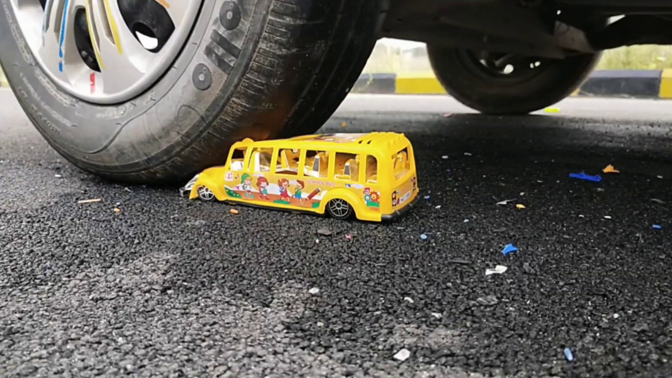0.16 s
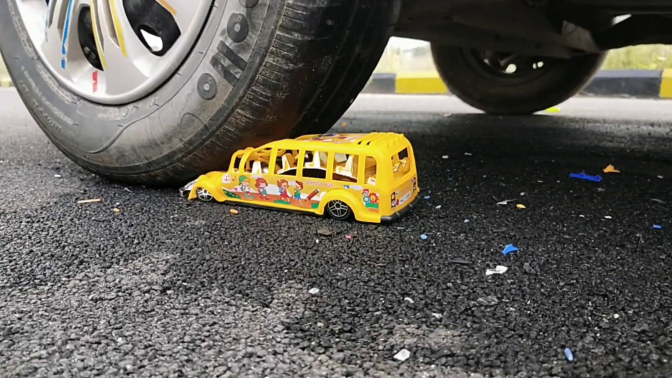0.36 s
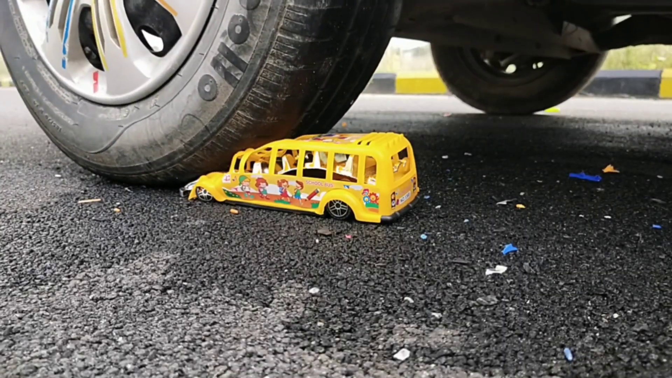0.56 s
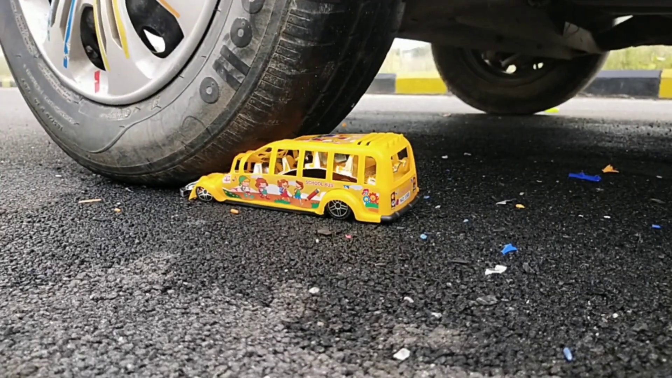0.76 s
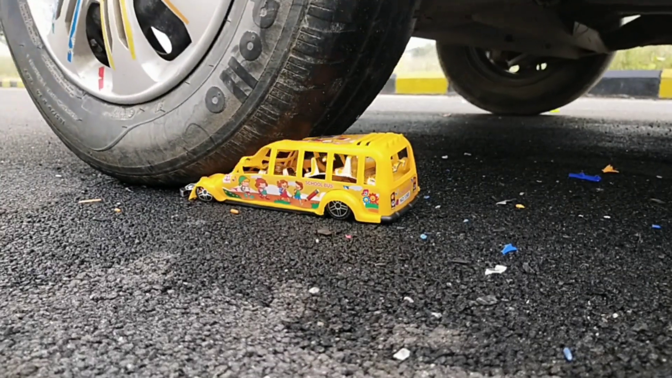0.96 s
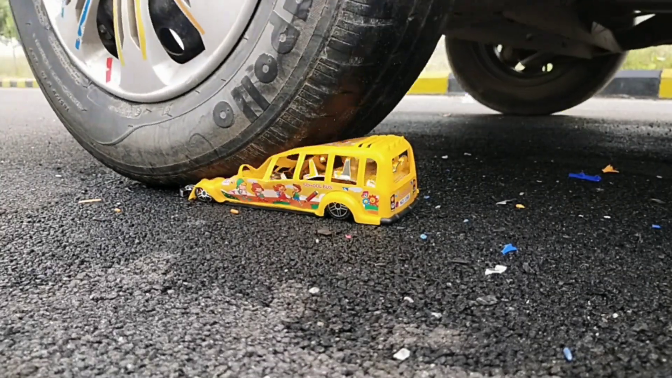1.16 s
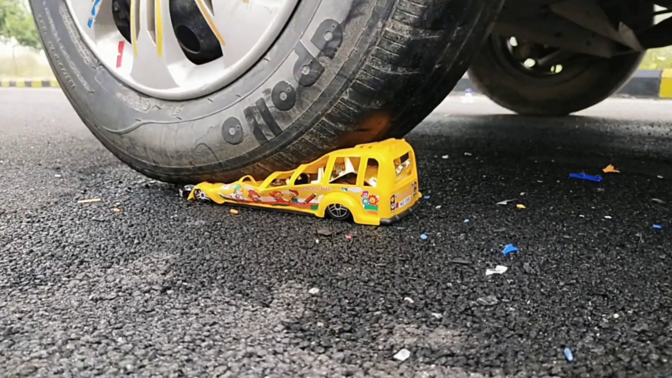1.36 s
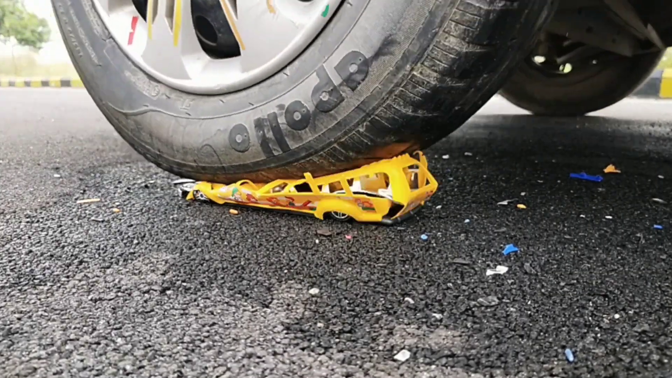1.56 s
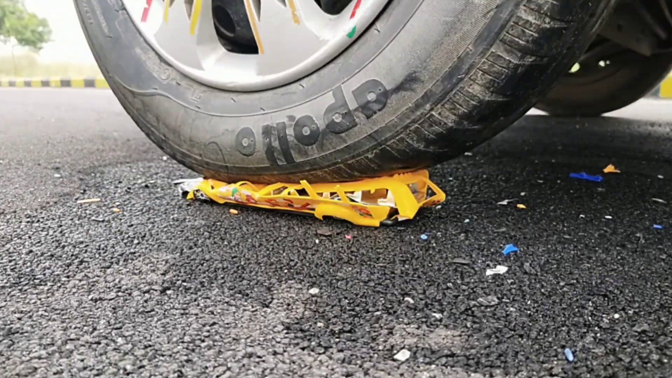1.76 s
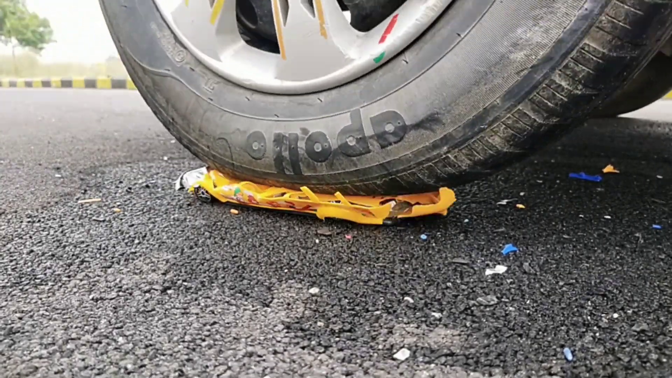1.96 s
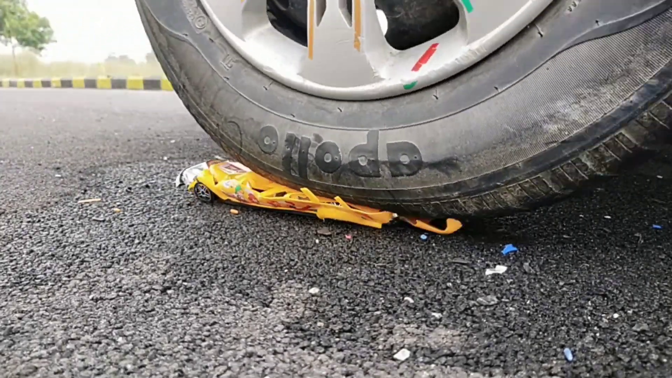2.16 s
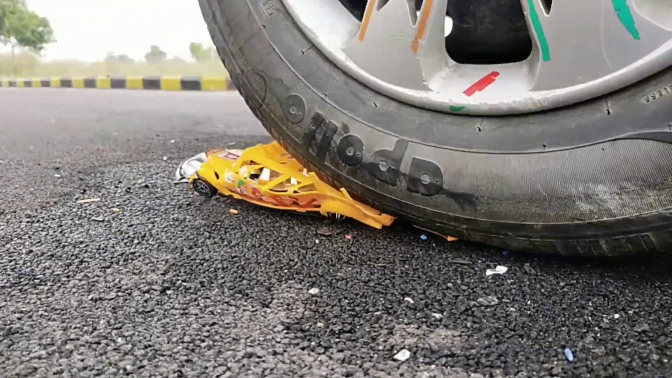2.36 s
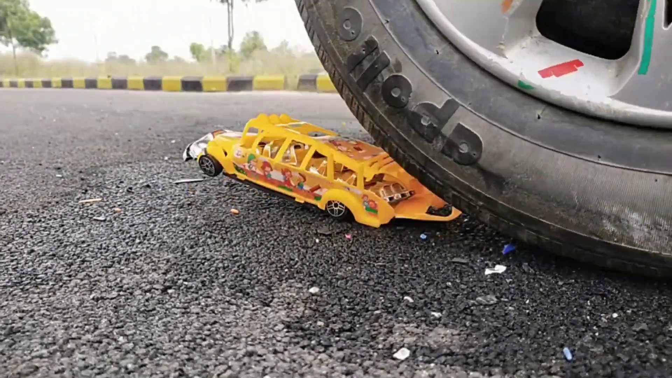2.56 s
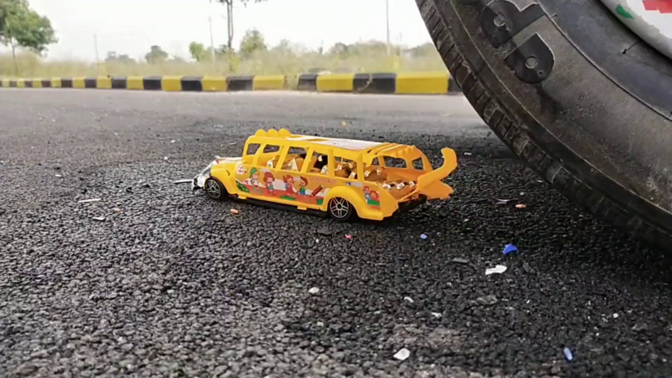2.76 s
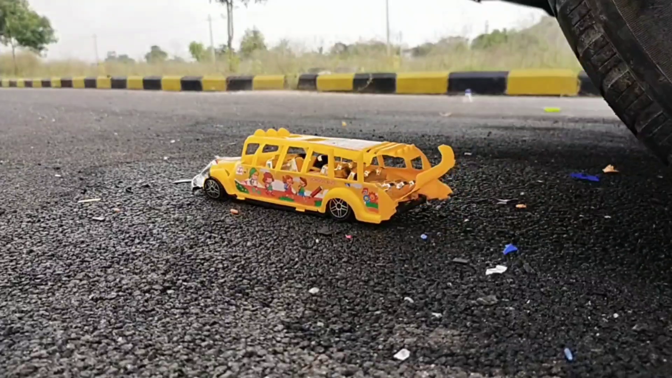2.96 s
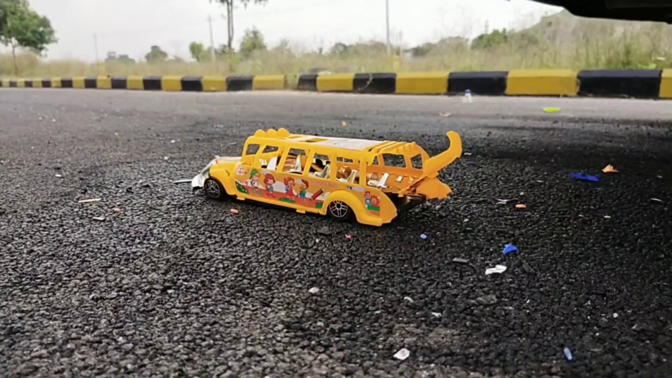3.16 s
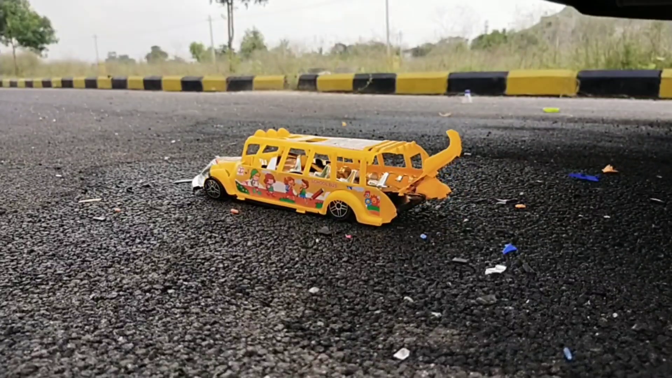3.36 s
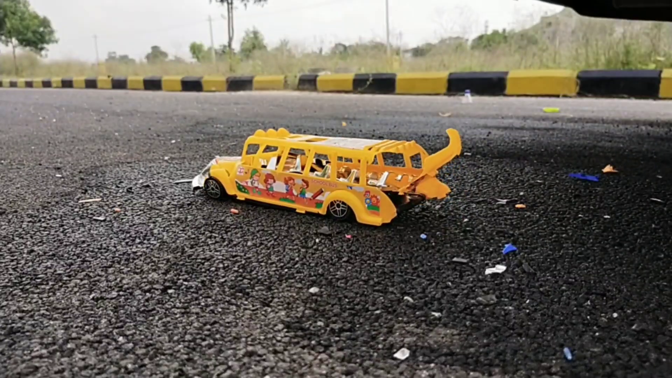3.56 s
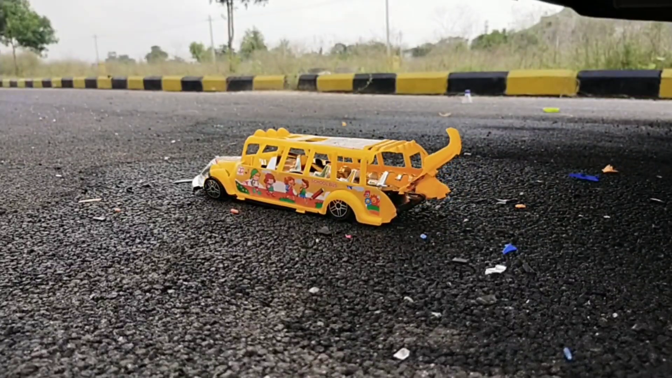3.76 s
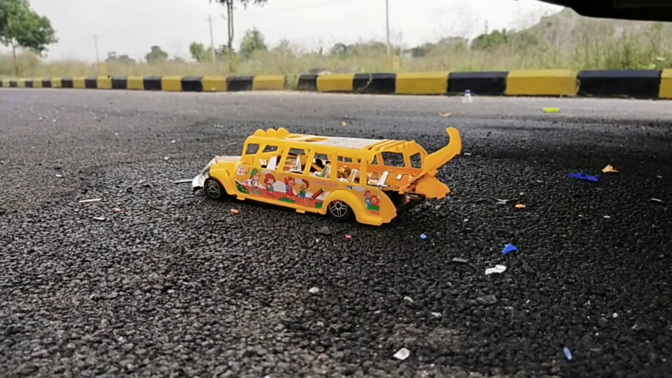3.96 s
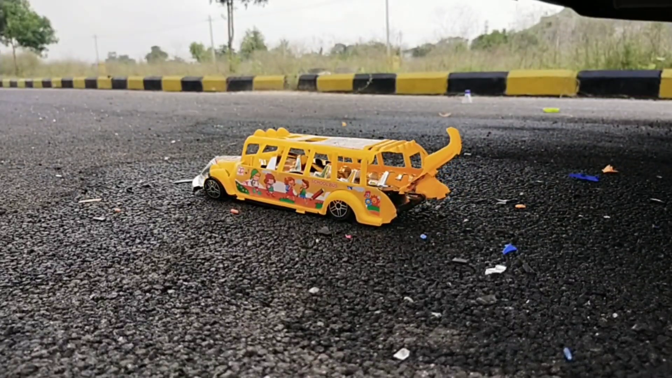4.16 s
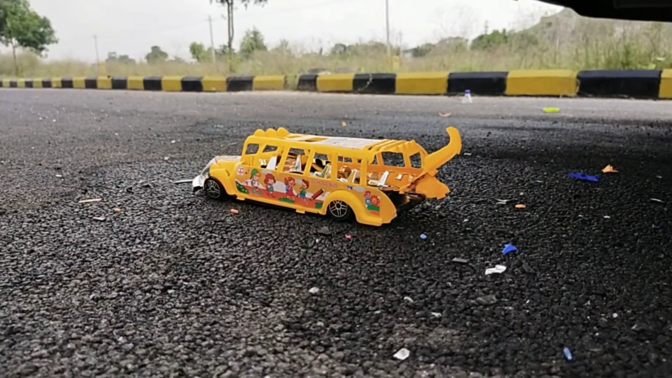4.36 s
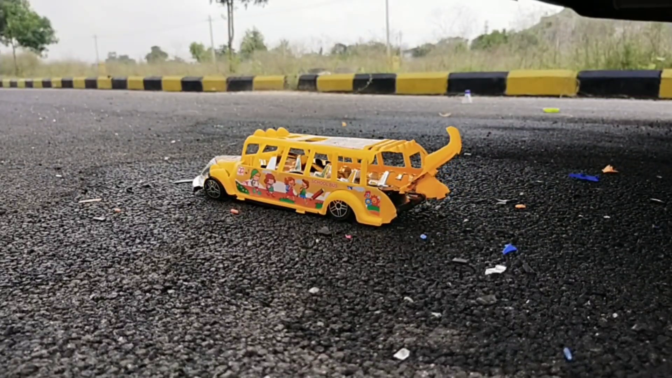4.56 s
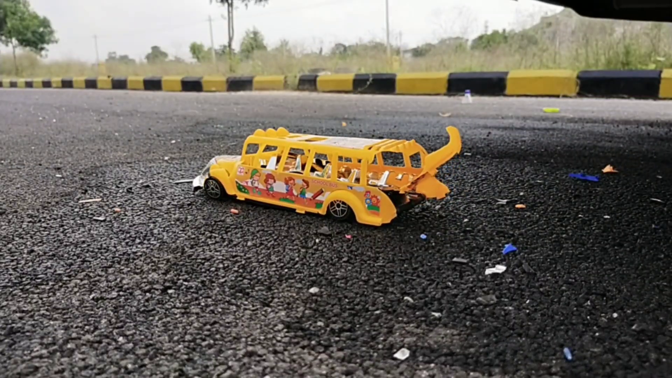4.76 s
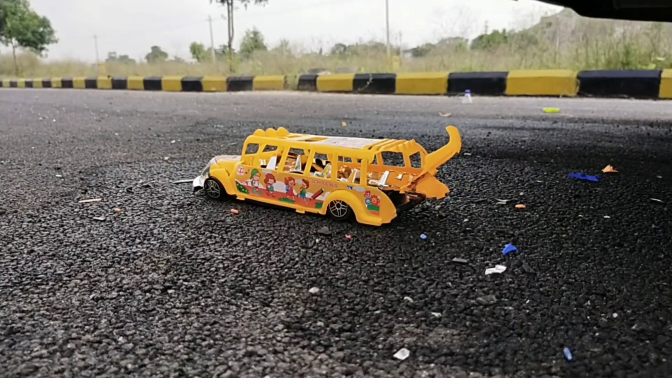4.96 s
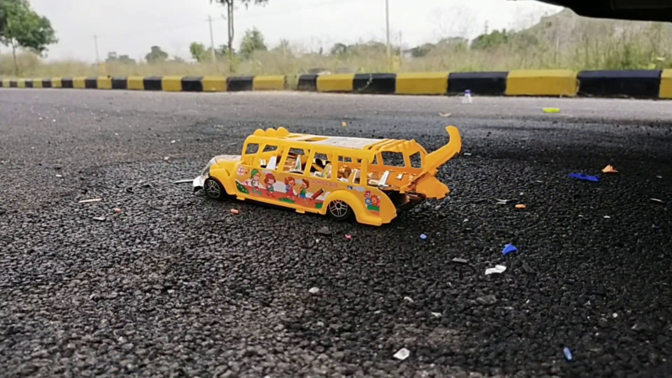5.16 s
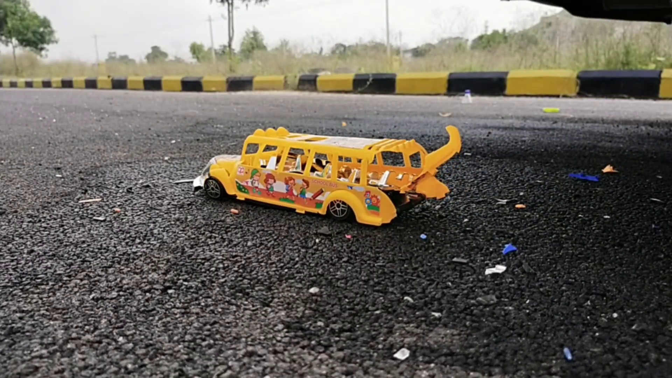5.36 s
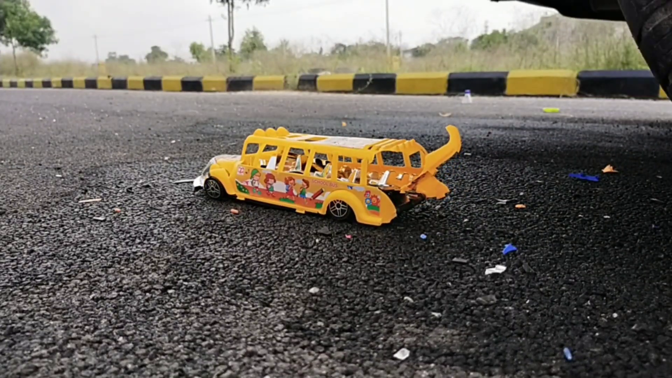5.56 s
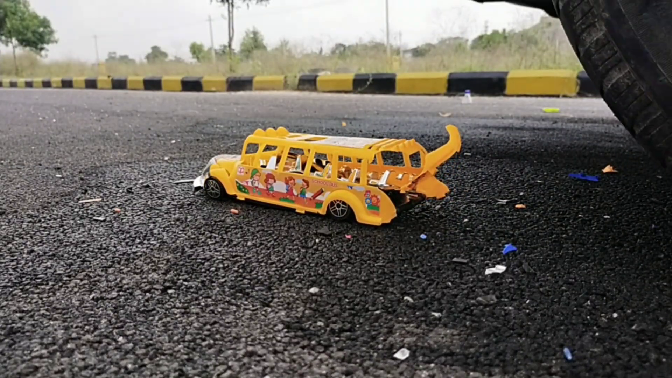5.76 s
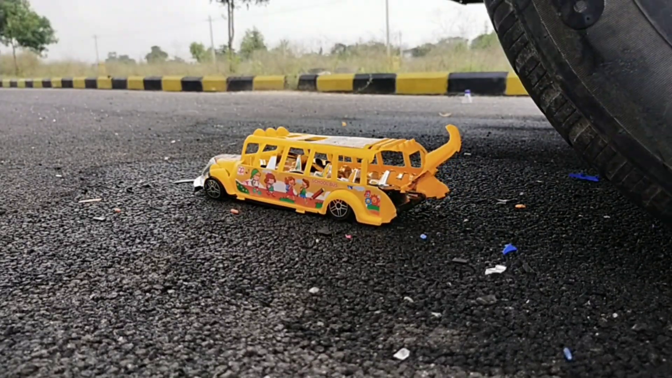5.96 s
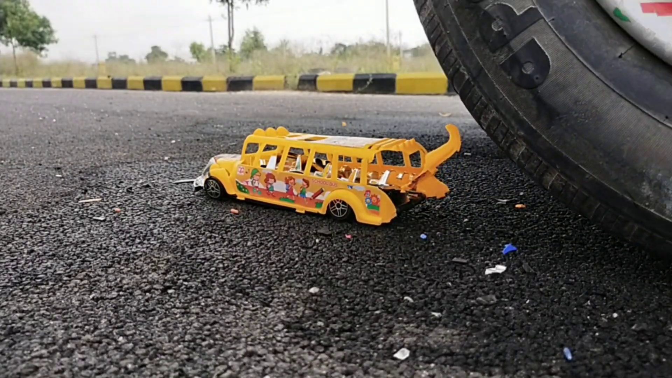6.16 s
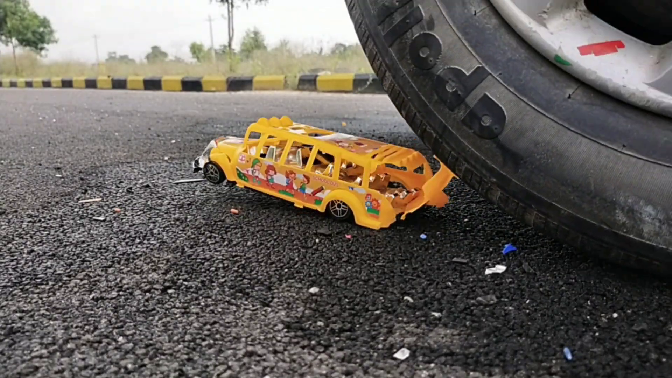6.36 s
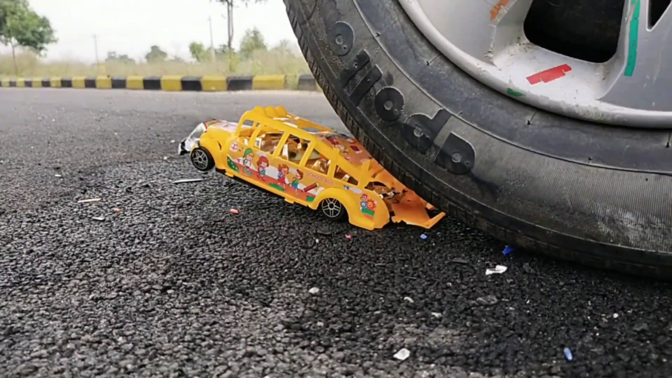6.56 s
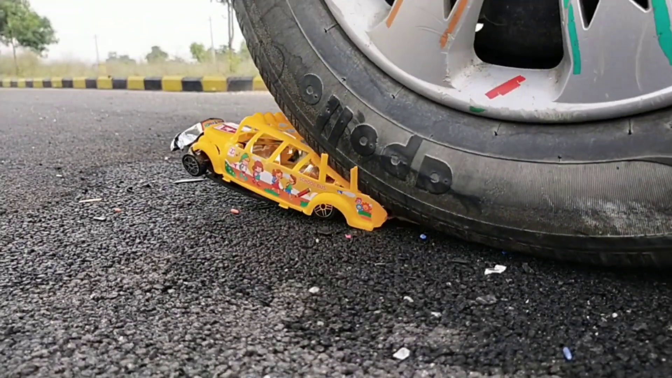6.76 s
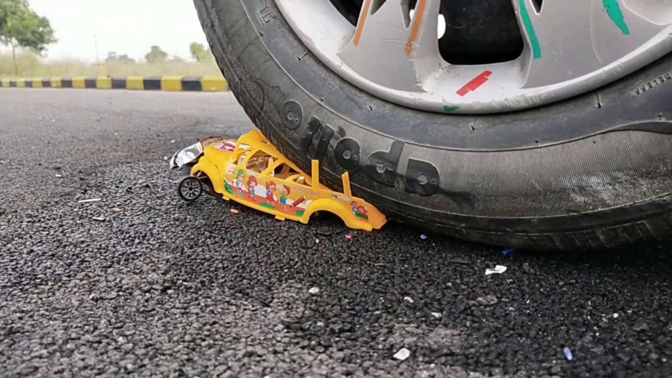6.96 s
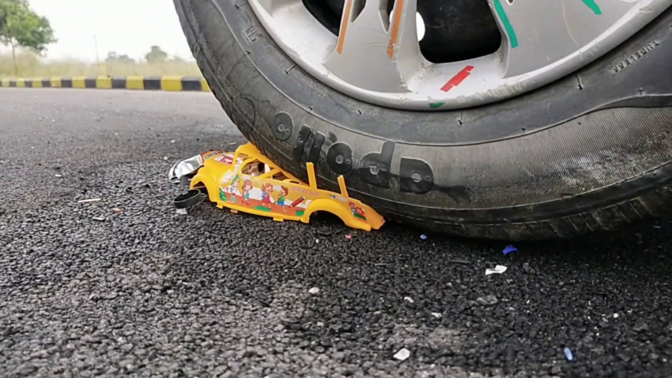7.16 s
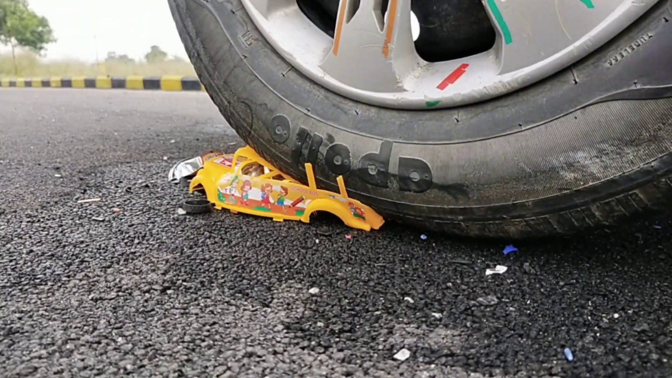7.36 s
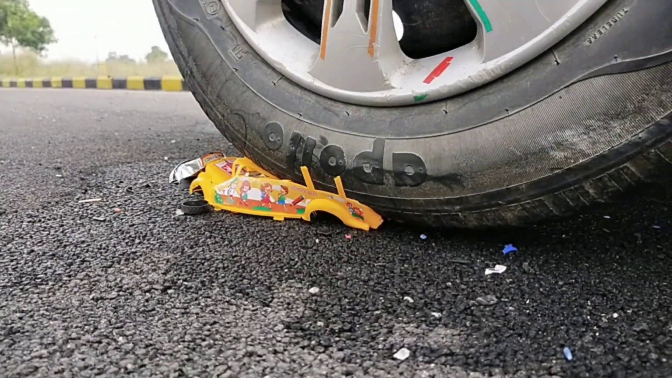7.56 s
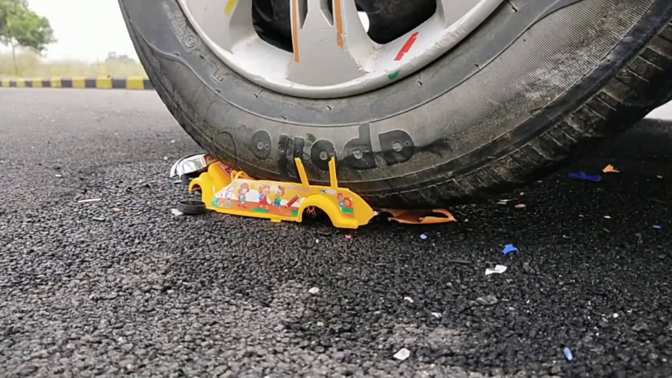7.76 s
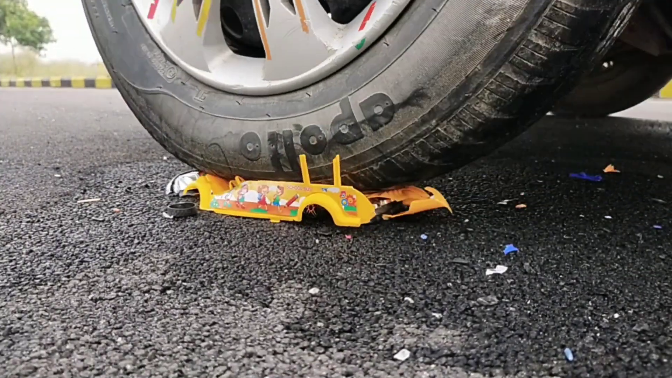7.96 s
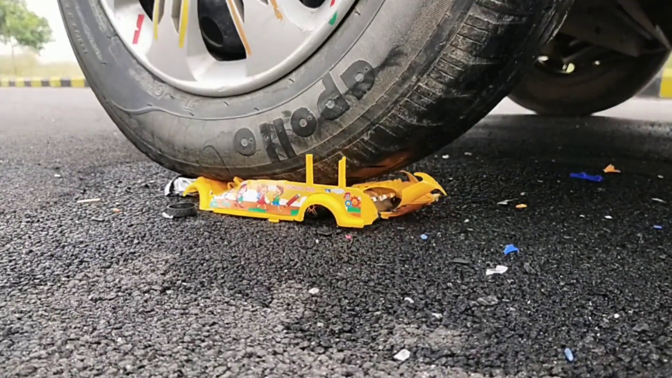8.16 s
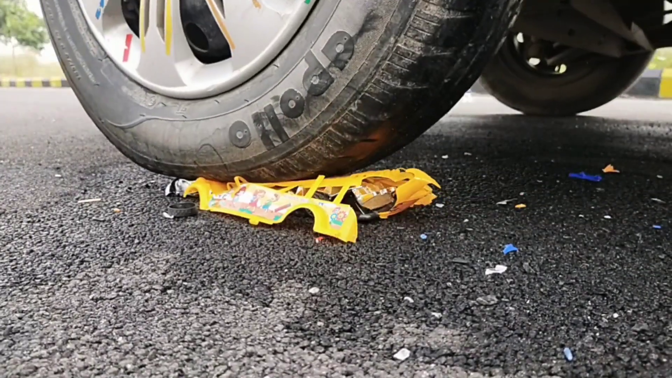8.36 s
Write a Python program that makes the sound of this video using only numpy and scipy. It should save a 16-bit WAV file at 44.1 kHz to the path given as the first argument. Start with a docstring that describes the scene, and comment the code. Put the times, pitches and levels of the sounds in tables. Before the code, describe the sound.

A four-cylinder engine idles softly, low and puffing with light metallic ticking, as a tyre bursts a thin plastic shell in loud irregular cracks, densest near two seconds. Grit crunches under the tread. The breaking stops, leaving idle, a faint squeak and dull knocks, then a second wheel brings smaller snaps and a few hard cracks. Close stereo microphones on open asphalt, dry, with thumps at some of the blows.

```python
"""A hollow plastic toy bus cracks on asphalt as a car rolls over it, front wheel first, rear wheel seconds later.
Each crack is a noisy fracture force filtered by the resonances of shell, panel and broken edge.
Grit, as decaying grains of noise, crackles under the tread; a four-cylinder engine idles above, as puffs,
low lines and metallic ticks; two dull knocks and a faint squeak come between the wheels.
Two microphones close to the road are jolted with low thumps, and the loudest peaks are flattened."""
import sys
import numpy as np
from scipy import signal
from scipy.fft import rfft, irfft
from scipy.io import wavfile
from scipy.ndimage import uniform_filter1d

SR = 44100
rng = np.random.default_rng(int(sys.argv[2]) if len(sys.argv) > 2 else 0)


def file_out(sig):
    """Save sig as 16-bit WAV at sys.argv[1]."""
    # one column per channel
    cols = np.atleast_2d(sig).T
    # limit, then scale
    lim = np.clip(cols, -1, 1)
    pcm = np.round(lim * 32767).astype(np.int16)
    wavfile.write(sys.argv[1], SR, pcm)


N = 374620
TIME = np.arange(N) / SR  # t/s

# Dull knocks under the car: [t/s, level before panning/dB, f/Hz, decay of the push/s]
KNOCKS = [(3.914, -51, 295, 0.0075), (4.155, -58.5, 616, .018)]

# Effort of the engine, rising as each wheel climbs the toy:
# [t/s, relative rumble level/dB, relative clatter level/dB]
ENGINE_EFFORT = [(0, -48.3, -53.5), (.45, -46.5, -56), (1.9, -45, -52.5), (2.8, -49.5, -57.5),
                 (4.3, -49.5, -59.5), (6.3, -48.5, -57.5), (6.85, -47.5, -55.5), (7.7, -45, -54.5),
                 (8.1, -48, -55.5), (8.49, -49.5, -55.5)]
# Spectrum of the exhaust rumble: [f/Hz, relative density level/dB]
RUMBLE_SPECTRUM = [(12, -27), (20, -3), (43, -0.5), (111, -3), (138, -8.5), (198, -10.5), (225, -15),
                   (301, -19), (447, -16), (517, -22), (653, -15.5), (769, -22), (1120, -25.5),
                   (1370, -30.5), (1500, -70), (1950, -60), (3300, -120)]
# Spectrum of the mechanical clatter: [f/Hz, relative density level/dB]
CLATTER_SPECTRUM = [(710, -11), (1200, -11), (1390, -13.5), (1500, -5), (1800, -13.5), (2050, -1),
                    (2740, -4.5), (3810, -4.5), (4830, -5.5), (6650, 2), (7480, -4), (9570, -10.5),
                    (11100, -9), (14200, -4), (15500, -5)]
# The four cylinders in firing order: [relative puff level/dB, relative tick level/dB]
CYLINDERS = [(-1, 4), (-2.5, -8), (-1.5, -14.5), (-1.5, -2)]
# How hard the valve gear ticks: [t/s, relative level/dB]
TICKING = [(0, -3), (3.3, -2), (4.5, 2), (4.8, -4.5), (6.1, -1), (8.49, -3.5)]
# Resonances of the engine casing: [f/Hz, relative level/dB, t60/s]
CASING_MODES = [(1270, -23, 0.026), (1372, -20, 0.045), (1768, -19.5, 0.018), (2100, -52, 0.0072),
                (3830, -23.5, 0.0038)]
# Exhaust lines at 1, 2 and 3 times the firing rate: [rms level before panning/dB]
EXHAUST_LINES = [-57.5, -60, -58.5]
# Gain of the engine at the right microphone: [f/Hz, gain/dB]
RIGHT_SHADE = [(200, 1.5), (1000, -1), (6000, -5), (7400, 2), (9000, -4.5), (11000, -5.5), (14500, -18)]
FIRING_HZ, FIRST_TICK_S = 39.88, 2.811
RIGHT_LAG = 21  # samples

# Spells in which the tread bites on the toy and its splinters: [start t/s, end t/s, grit level/dB]
BITES = [(0, .1, -47), (.18, 0.354, -52), (.4, 0.86, -58), (.92, 1.8, -55.5), (1.879, 1.969, -44),
         (2.319, 2.547, -52.5), (2.996, 3.017, -56), (6.409, 6.602, -55), (6.659, 6.968, -52),
         (7.52, 8.1, -55), (8.24, 8.49, -50)]
BITE_ATTACK_S, BITE_RELEASE_S, ROLLING_DB = .03, .06, -66.5
# Spectrum of grit and splinters: [f/Hz, relative density level/dB]
GRIT_SPECTRUM = [(300, -7), (700, 2), (1800, -6), (3500, -0.5), (5000, -2.5), (6700, 1), (9500, -5.5),
                 (15000, -36)]

# Jolts of the microphones: [t/s, left step/full scale, right step/full scale, rise/s],
# the steps before rise and recovery shape them
JOLTS = [(0.0767, -0.0058, -0.25, 0.00055), (1.1914, 0.043, 0.21, 0.0026), (1.417, 0.59, -0.49, 0.00071),
         (1.5303, 0.54, 0.34, 0.0042), (1.705, -0.63, 0.33, 0.00062), (1.842, -0.014, -0.11, 0.0018),
         (1.909, 0.67, -0.14, 0.0026), (1.955, -0.56, 0.35, 0.0021), (2.1469, -0.014, -0.2, 0.0006),
         (7.597, 0.024, -0.28, 0.00028)]

# Cracks of the shell: [t/s, relative level/dB, length of the tear/s, rattle re tear/dB, body re snap/dB,
# middle re snap/dB, panel f/Hz, relative left minus right level/dB]
CRACKS = [(.0076, -27, 0.0016, -10.5, -6.5, 2, 1240, 2), (0.027, -42.5, 0.00084, -9, -13, 13, 1110, 2),
          (0.049, -26, 0.00079, -15, -8, 3, 1200, 3), (.0705, -35.5, 0.0012, -6, -12, 1, 1340, 3),
          (.075, -19.5, 0.0026, -10, -17, -10.5, 1730, 0), (0.1288, -40.5, 0.0027, -1, 2, 4.5, 680, 1),
          (0.1888, -20.5, 0.00081, -9.5, -16.5, -9.5, 1750, 1.5),
          (.192, -30.5, 0.002, -15, -13.5, 0.5, 730, 5.5), (0.2673, -15.5, 0.002, -14, -14, -6, 1200, 0),
          (.2955, -30.5, .0027, -7, -4, -3, 750, 2), (0.3317, -25.5, 0.006, -9, -4.5, -4, 1030, 1.5),
          (0.339, -24, .0034, -5, -13, 1, 785, 2.5), (1.014, -40, 0.0013, 0.5, 7, 7.5, 716, 4),
          (1.106, -30.5, 0.0013, -14, -4.5, -9.5, 1320, 0.5),
          (1.1916, -14.5, .0028, -32, -7, -4, 720, -2.5), (1.204, -36, 0.0009, -7, -11, 0, 610, 9),
          (1.2302, -39.5, .0018, -5, -4, -4, 610, 2), (1.2557, -18.5, 0.0018, -7.5, -6.5, 1, 1030, 1),
          (1.271, -31.5, 0.0028, -13, -12, -11, 620, 2), (1.3289, -37.5, 0.0019, -18, -29, 3.5, 750, 4.5),
          (1.4157, -20, 0.0031, -5.5, 2, -3, 694, 1.5), (1.534, -25.5, .0026, 7, -14.5, -9, 586, 2.5),
          (1.6158, -50.5, .0016, 8, 0, -2, 650, 1), (1.7035, -19.5, 0.001, -11, -16, -10.5, 1420, 0),
          (1.742, -24.5, .0035, -14, -15, -5, 1820, 1.5), (1.8391, -12, 0.0017, -9, -19.5, -5, 875, 3.5),
          (1.8453, -26.5, 0.0015, -4, -0.5, -17, 440, 3), (1.89, -43, .0014, -10, -7, 7, 1380, 1),
          (1.9112, -27, 0.005, 1, -14, -9.5, 620, 5.5), (1.9202, -34.5, .0044, 12, 0.5, -12, 585, 2),
          (1.9498, -30, .006, 11, -7, -11, 553, -3), (1.9615, -25.5, 0.0036, -1, -20, -6, 666, 8),
          (1.9897, -32.5, 0.0034, -24, -4.5, -7, 797, 4), (2.1446, -16.5, .0014, -15, -7.5, -8.5, 620, 4),
          (2.2966, -34.5, .003, -8, -8, -5, 880, -1), (2.3249, -27.5, 0.00087, -10.5, -32, 0.5, 1280, 1),
          (2.3485, -37.5, .0027, -4, -10, -8, 780, 3), (2.354, -34, 0.001, -5, -19, -1, 1090, 0),
          (2.468, -35.5, 0.0032, 6, -16, -8, 710, 3), (2.4909, -39.5, 0.0041, -3, -8, -4.5, 1630, 0),
          (2.5599, -42, .003, 3, -13, -11, 660, 5), (2.6434, -45.5, 0.0023, 3, -2.5, 0.5, 626, 0.5),
          (6.591, -48.5, .0025, 9, 2.5, -3, 511, 6), (6.64, -29.5, 0.00096, -18, -15, -6, 615, 0),
          (6.643, -37, 0.0052, -11, 0.5, -6, 1690, 1), (6.6794, -39, .001, -19, -15, -12, 670, 1),
          (6.707, -21.5, 0.00056, -13.5, -21, -11.5, 1320, 3), (6.7685, -32.5, .003, -4, -7, 0, 626, 2),
          (6.846, -32.5, 0.00096, -25, -28, -7.5, 612, 2), (6.8835, -42.5, .0027, 2, -6, -6, 830, 2),
          (6.9274, -34.5, .0011, -6, -5.5, -3, 855, 1.5), (6.977, -41, 0.0027, 7, 4, 2, 1360, 1),
          (6.987, -34, 0.00062, -10, -3, 3, 780, -0.5), (7.1374, -46, 0.0016, -2, -14, 0, 640, -1),
          (7.3251, -47, .003, -9, -20, -7, 820, -1), (7.5392, -43.5, 0.0027, 0, 1.5, -4.5, 710, 1),
          (7.5975, -31.5, 0.0013, -13, -11, -11, 690, -3), (7.7023, -42.5, 0.0012, -14, 6, 9, 710, 0),
          (7.7108, -36.5, .0016, -1, -11, 0, 740, -4), (7.7175, -23, 0.00028, -10.5, -9.5, -4.5, 1040, 1.5),
          (7.761, -36.5, 0.0015, -8, -28, -9, 947, 3), (7.7782, -20, 0.0038, -4.5, -12, -7, 830, 3),
          (7.8382, -40, 0.0018, -9, -4.5, -5.5, 440, 3), (7.923, -41.5, 0.0021, -9, -14, 0, 1390, 2),
          (7.9604, -45.5, .0006, -4, -21, -9, 720, 3), (8.1775, -43.5, 0.0015, -10, -14, -5, 550, 2),
          (8.2065, -43, 0.0012, -7, -17, 0.5, 550, 4), (8.2292, -17.5, 0.0014, -3.5, -17, -18.5, 1200, 3.5),
          (8.234, -38, .0035, 9, -9, 2.5, 1230, 2), (8.2409, -24.5, 0.0024, -4, -22, -8, 672, -1),
          (8.339, -39.5, .0017, -4, -12, -8, 657, 6), (8.3902, -36.5, 0.0025, -14, -10.5, -9, 1165, 5),
          (8.4287, -44.5, .0024, -6, 5, -12, 624, 0), (8.483, -26, 0.002, -8, 5.5, 3.5, 616, -1)]
# Radiation of the hollow shell: [f/Hz, relative level/dB]
SHELL_RADIATION = [(120, -17.5), (290, -4), (450, -1), (530, -6.5), (640, -1.5), (1050, 0), (1900, -4.5),
                   (3100, -1), (4900, 0), (6800, 5), (8300, -3), (9800, -4.5), (14000, -12), (16000, -13)]
# Resonances of the whole shell: [f/Hz, half width/Hz, peak/dB]
SHELL_MODES = [(483, 17, 3.5), (605, 48, 1.5), (1010, 56, 0.5), (1600, 52, 1), (2950, 12, 1.5),
               (6160, 95, -1.5), (12500, 170, 2), (14330, 190, 8.5)]
# The toy at the two microphones: [f/Hz, left minus right level/dB, power share common to both/0-1]
MICROPHONES = [(405, -1, 0.81), (1000, 1, 0.55), (3360, 0.5, 0.34), (5730, 2.5, 0), (7900, -2.5, 0.27),
               (9500, -2.5, 0.06), (14000, 6, 0.14)]
# Edges of the body, middle, snap and top ranges of a crack: [f/Hz]
RANGE_EDGES = [300, 1500, 4500, 9000, 15500]
# Broken edges ring near one pitch; where the middle outweighs the snap the edge is long and rings lower
EDGE_HZ, LONG_EDGE_HZ, EDGE_SPREAD_OCTAVES = 6800, 2870, 0.13
PANEL_OVERTONE = 2.25  # second mode of a panel, as a multiple of its first
# The top range re the snap, in dB, and its rise in dB per dB of body
TOP_RANGE_DB, TOP_PER_BODY = -4, 0.18
# Faint snaps start above the yield level; the rate holds for a bite of twice that amplitude
SNAPS_PER_S, YIELD_DB, SNAP_DB, SNAP_SPREAD_DB = 14, -57, -48, 1

TOP_HZ = 15500  # upper limit of the passband


def undb(db):
    """Amplitude gain is an exponential function of level in decibels."""
    return 10 ** (np.asarray(db) / 20)


def unit(x):
    """Normalization divides a signal by its root mean square."""
    return x / np.sqrt(np.mean(x ** 2) + 1e-20)


def curve(table, axis=1):
    """Linear interpolation joins one column of a table over time."""
    rows = np.array(table)
    return np.interp(TIME, rows[:, 0], rows[:, axis])


def spectrum(table, f, axis=1):
    """Linear interpolation over log frequency joins one column of a table."""
    rows = np.array(table)
    return np.interp(np.log(np.maximum(f, 1)), np.log(rows[:, 0]), rows[:, axis])


def pan(db):
    """A level difference is split evenly between left and right gains."""
    return undb(np.array([[db], [-db]]) / 2)


def equalize(x, points):
    """Zero-phase filtering scales each Fourier component by its tabulated gain."""
    f = np.arange(N // 2 + 1) * SR / N
    return irfft(rfft(x) * undb(spectrum(points, f)), N)


def colour(x, points):
    """Spectral weighting gives a signal its tabulated colour, at rms 1."""
    return unit(equalize(x, points))


def band(x, lo_hz, hi_hz, order=2):
    """A causal Butterworth filter passes one band of frequencies."""
    sos = signal.butter(order, [lo_hz, min(hi_hz, .48 * SR)], "bandpass", fs=SR, output="sos")
    return signal.sosfilt(sos, x)


def ring(x, hz, t60):
    """A driven damped mode is a two-pole resonator whose ringing falls 60 dB in t60."""
    r = np.exp(-np.log(1000) / (t60 * SR))
    return signal.lfilter([1, 0, -1], [1, -2 * r * np.cos(2 * np.pi * hz / SR), r * r], x)


def microphone_pair(noises, shared):
    """Partial coherence: each side sums one common noise and one of its own, by power share."""
    shared = np.clip(shared, 0, 1)
    return np.sqrt(shared) * noises[0] + np.sqrt(1 - shared) * noises[1:]


def causal(db):
    """Minimum phase: folding the cepstrum makes a response that rings only after the blow."""
    cepstrum = irfft(np.log(undb(db)))
    half = len(cepstrum) // 2
    cepstrum[1:half] *= 2
    cepstrum[half + 1:] = 0
    return np.exp(rfft(cepstrum))


def add(out, s, sound):
    """Superposition: a sound sums into the mix from time s on."""
    start = int(round(s * SR))
    a, b = max(start, 0), min(start + sound.shape[-1], N)
    if b > a:
        out[:, a:b] += sound[:, a - start:b - start]


def squeak(s=3.27, hz=2000, db=-64.5, length_s=.03):
    """Frequency modulation: a faint tone wavers under a Gaussian envelope while the car rolls on."""
    waver = unit(uniform_filter1d(rng.standard_normal(N), size=200))
    pitch = hz * (1 + 0.0097 * waver)
    envelope = np.exp(-((TIME - s) / length_s) ** 2)
    return undb(db) * envelope * np.sin(2 * np.pi * np.cumsum(pitch) / SR)


def knocks(size=6000):
    """Heavy damping: soft noisy pushes on the underbody excite a broad band instead of a clear pitch."""
    out, t = np.zeros((2, N)), np.arange(size) / SR
    for s, db, hz, push_s in KNOCKS:
        push = rng.standard_normal(size) * np.sqrt(t) * np.exp(-t / push_s)
        knock = unit(band(push, hz / 1.67, hz * 1.42))
        add(out, s, undb(db) * pan(7.2) * knock)
    return out


def exhaust(firings, phase, puff_db):
    """Periodic excitation: firings modulate broadband rumble and sustain harmonics of the firing rate."""
    puffs = 1.07 + undb(puff_db) * np.exp(-phase / 0.38)
    noise = microphone_pair(rng.standard_normal((3, N)), 0.94)
    rumble = colour(puffs * noise, RUMBLE_SPECTRUM) * undb(curve(ENGINE_EFFORT) + 3.0)
    lines = np.zeros(N)
    for k, db in enumerate(EXHAUST_LINES, 1):
        lines += undb(db) * np.sqrt(2) * np.sin(2 * np.pi * (k * firings + rng.random()))
    return (rumble + lines) * pan(4.3)


def valve_gear(phase, tick_db):
    """Impact excitation: clusters of small metal contacts tick and ring the engine casing."""
    swell = np.sin(np.pi * phase ** .6) ** 2
    ticks = undb(tick_db + curve(TICKING)) * swell
    contacts = undb(1.3 * unit(uniform_filter1d(rng.standard_normal(N), size=130)))
    noise = microphone_pair(rng.standard_normal((3, N)), 0.27)
    rattle = np.sqrt(1 + 2 * ticks ** 2) * contacts * noise
    casing = sum(undb(db) * unit(ring(rattle, hz, t60)) for hz, db, t60 in CASING_MODES)
    clatter = colour(rattle, CLATTER_SPECTRUM) + casing
    return clatter * undb(curve(ENGINE_EFFORT, axis=2) + 4.5) * pan(2.02)


def engine():
    """Cyclic variation: each firing puffs the exhaust and ticks the valve gear, one cylinder loudest."""
    firings = (TIME - FIRST_TICK_S) * FIRING_HZ
    number, phase = np.floor(firings).astype(int), firings % 1
    puff_db, tick_db = np.array(CYLINDERS)[number % len(CYLINDERS)].T
    # one random draw per firing; negative numbers count from the end
    scatter = rng.standard_normal((number.max() + 8, 2))[number].T
    puffing = exhaust(firings, phase, puff_db + 3.0 * scatter[0])
    ticking = valve_gear(phase, tick_db + 1.1 * scatter[1])
    left, right = puffing + ticking
    # the right microphone hears the engine later, and mostly duller
    return np.array([left, np.roll(equalize(right, RIGHT_SHADE), RIGHT_LAG)])


def bite():
    """Contact load: each spell of grinding sets in, holds and dies away, over a floor of plain rolling."""
    spells = []
    for start, end, db in BITES:
        before = np.maximum(start - TIME, 0) / BITE_ATTACK_S
        after = np.maximum(TIME - end, 0) / BITE_RELEASE_S
        spells.append(undb(db) * np.exp(-before - after))
    return np.maximum(np.max(spells, axis=0), undb(ROLLING_DB))


def grit(per_s=170, spread_db=1.5, decay_s=.002):
    """Shot noise: stones and splinters tick at random under the tread, some up to 4.5 dB louder."""
    loudness = undb(spread_db * np.minimum(rng.exponential(size=N), 3))
    grains = (rng.random(N) < per_s / SR) * loudness
    power = signal.lfilter([1], [1, -np.exp(-2 / (decay_s * SR))], grains ** 2)
    noise = microphone_pair(rng.standard_normal((3, N)), 0.43)
    return colour(np.sqrt(power) * noise, GRIT_SPECTRUM) * bite()


def jolts(recover_s=0.042, size=16384):
    """Damped recoil: a microphone is kicked off its rest point, swings back once and settles."""
    out, t = np.zeros((2, N)), np.arange(size) / SR
    for s, left, right, rise_s in JOLTS:
        swing = (1 - np.exp(-t / rise_s)) * (1 - t / recover_s) * np.exp(-t / recover_s)
        add(out, s, np.array([[left], [right]]) * swing)
    return out


def snaps(tear_s=0.0022, rattle_db=-4, body_db=-9, middle_db=-6, panel_hz=720, count=80):
    """Strain release: a faint crack comes each time enough strain has built up under a hard bite."""
    excess = np.maximum(bite() / undb(YIELD_DB) - 1, 0)
    strain = np.cumsum(np.minimum(excess, 2)) * SNAPS_PER_S / SR
    gives = np.arange(count) + rng.random(count)
    chance = rng.standard_normal((count, 4))
    faint = []
    for at, (loud, dull, pitch, side) in zip(gives, chance):
        if at < strain[-1]:
            faint.append((np.interp(at, strain, TIME), SNAP_DB + SNAP_SPREAD_DB * loud, tear_s, rattle_db,
                          body_db + 4 * dull, middle_db + 3 * dull, panel_hz * 2 ** (.4 * pitch),
                          1 + 2.5 * side))
    return faint


def fracture(clock, tear_s, rattle_db):
    """Brittle fracture: the wall creaks, tears in tiny breaks, the shell rattles, the underbody echoes."""
    t = np.maximum(clock, 0)
    chance = rng.standard_normal((2, len(t)))
    creak = unit(np.exp(-np.abs(clock) / 0.001))
    tear = unit((1 - np.exp(-t / 0.00022)) / (1 + (t / max(tear_s, .0003)) ** 6))
    flutter = undb(2.1 * unit(uniform_filter1d(chance[0], size=50)))
    rattle = unit((1 - np.exp(-t / 0.00086)) * np.exp(-t / 0.0078) * flutter)
    echo = unit((1 - np.exp(-t / 0.0064)) * np.exp(-t / 0.048))
    power = tear ** 2 + (undb(-9.5) * creak) ** 2 + (undb(rattle_db) * rattle) ** 2 + (undb(-40) * echo) ** 2
    return np.sqrt(power) * undb(1.9 * chance[1])


def crack(force, body_db, middle_db, top_db, panel_hz, edge_hz, count=9):
    """Forced vibration: fracture drives the shell; yielding panel, broken edge and loose flaps ring above it."""
    size = len(force)
    f = np.arange(size // 2 + 1) * SR / size
    noises = rfft(force * rng.standard_normal((3, size)))
    drive = microphone_pair(noises, spectrum(MICROPHONES, f, axis=2))
    drive = drive * undb(np.outer([.5, -.5], spectrum(MICROPHONES, f)))
    # modes as (f/Hz, half width/Hz, peak/dB)
    flaps = [(hz, 80, 5) for hz in rng.uniform(1500, 9000, count)]
    panel = [(panel_hz, 140, 7.5), (PANEL_OVERTONE * panel_hz, 180, 3.5)]
    modes = [*panel, (edge_hz, 220, 4.5), *flaps, *SHELL_MODES]
    shell_db = spectrum(SHELL_RADIATION, f)
    shell_db = shell_db + sum(db / (1 + ((f - hz) / width) ** 2) for hz, width, db in modes)
    # every crack shares its energy between the four ranges in its own way
    power = np.mean(np.abs(drive) ** 2, axis=0) * undb(shell_db) ** 2 * 2 / size
    power = power / (SR / 100)  # levels refer to the rms over a hundredth of a second
    shares = []
    for lo, hi, db in zip(RANGE_EDGES, RANGE_EDGES[1:], (body_db, middle_db, 0, top_db)):
        present_db = 10 * np.log10(power[(f > lo) & (f < hi)].sum())
        shares.append((np.sqrt(lo * hi), db - present_db))
    return irfft(drive * causal(shell_db + spectrum(shares, f)))


def toy(size=4096, lead_s=.006):
    """Superposition: loud cracks and the faint snaps between them sum, each with its creak ahead of it."""
    out = np.zeros((2, N))
    clock = np.arange(size) / SR - lead_s
    for s, db, tear_s, rattle_db, body_db, middle_db, panel_hz, pan_db in CRACKS + snaps():
        centre_hz = LONG_EDGE_HZ if middle_db > 0 else EDGE_HZ
        edge_hz = centre_hz * 2 ** (EDGE_SPREAD_OCTAVES * rng.standard_normal())
        top_db = TOP_RANGE_DB + TOP_PER_BODY * body_db
        force = fracture(clock, tear_s, rattle_db)
        sound = crack(force, body_db, middle_db, top_db, panel_hz, edge_hz)
        add(out, s - lead_s, undb(db + 0.43) * pan(pan_db - .9) * sound)
    return out


def scene():
    """Superposition: the breaking toy sounds in front of the idling car."""
    return squeak() + knocks() + engine() + grit() + jolts() + toy()


def record(dry):
    """Saturation flattens the loudest peaks; an elliptic low-pass then cuts the top."""
    ceiling = .74  # full scale
    flattened = dry / (1 + (dry / ceiling) ** 6) ** (1 / 6)
    return signal.sosfilt(signal.ellip(8, .2, 70, TOP_HZ, fs=SR, output="sos"), flattened)


dry = scene()
out = record(dry)
file_out(out)
```